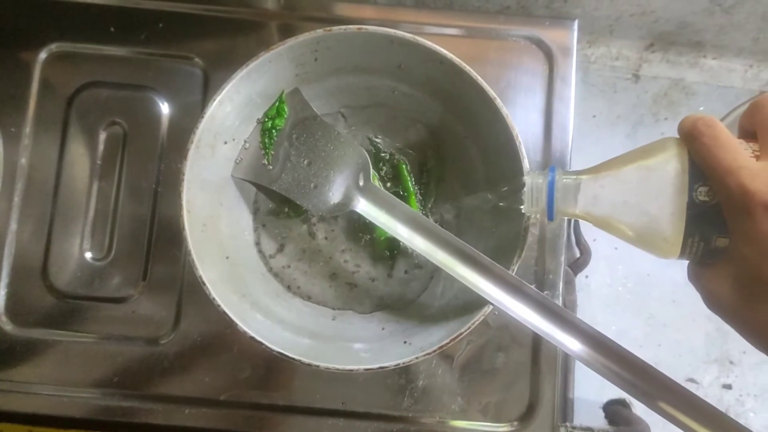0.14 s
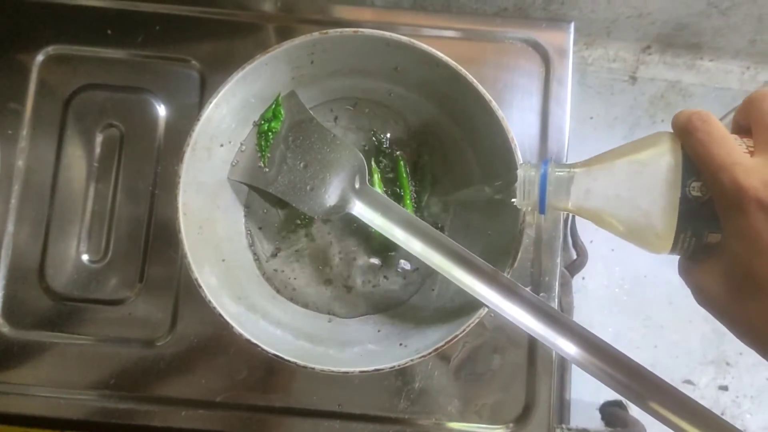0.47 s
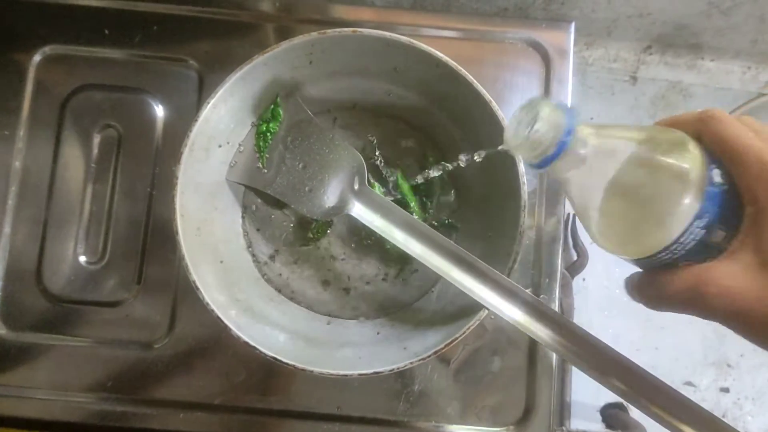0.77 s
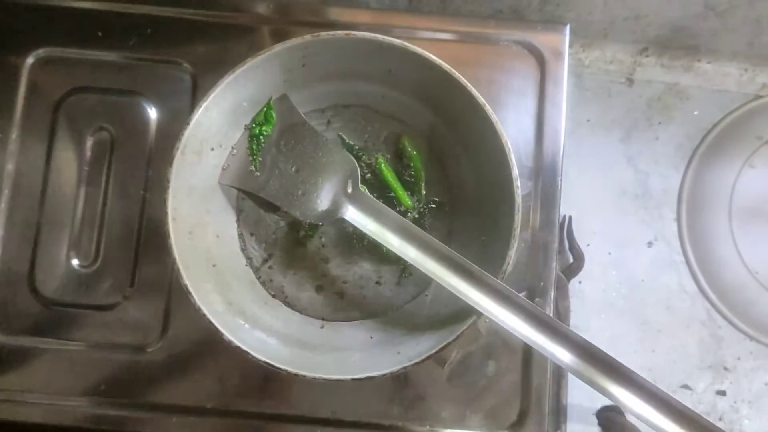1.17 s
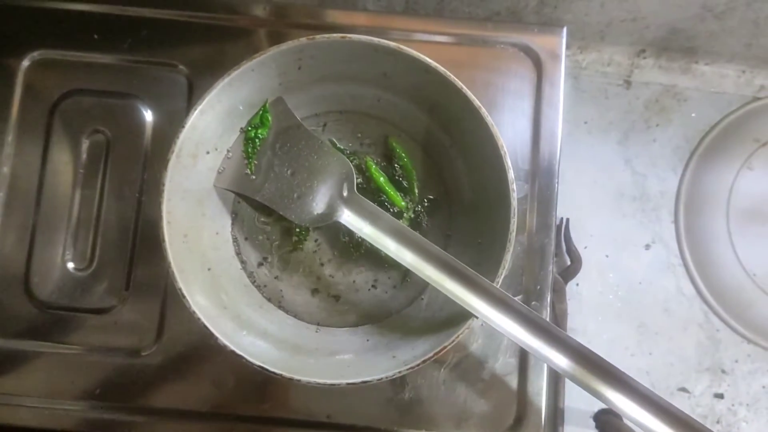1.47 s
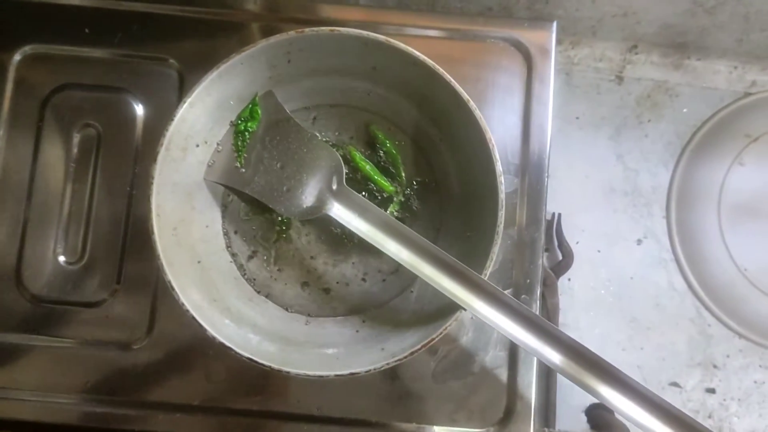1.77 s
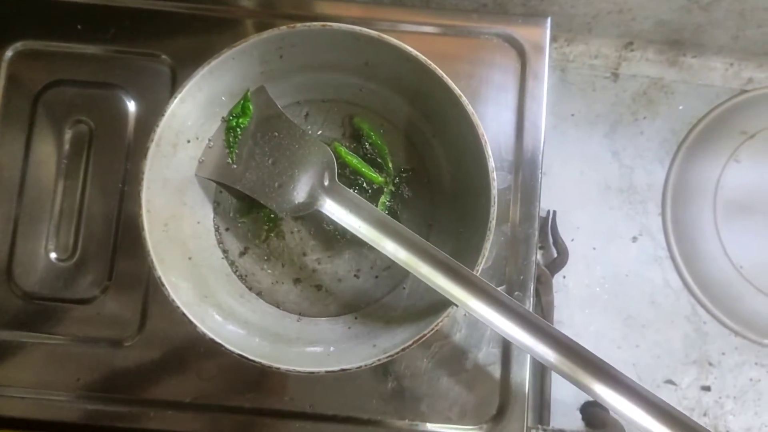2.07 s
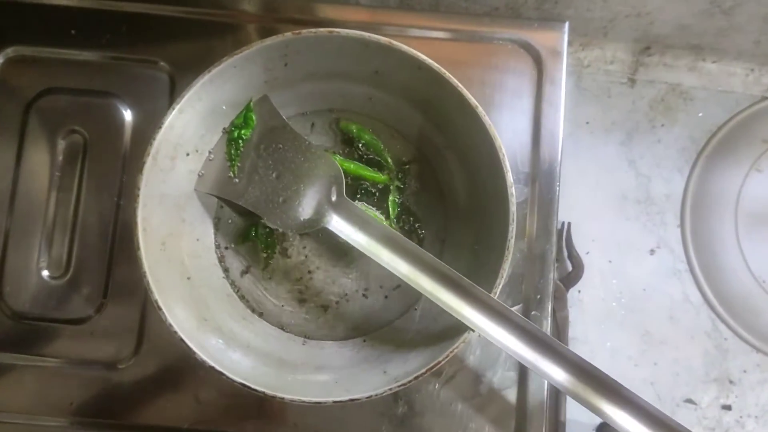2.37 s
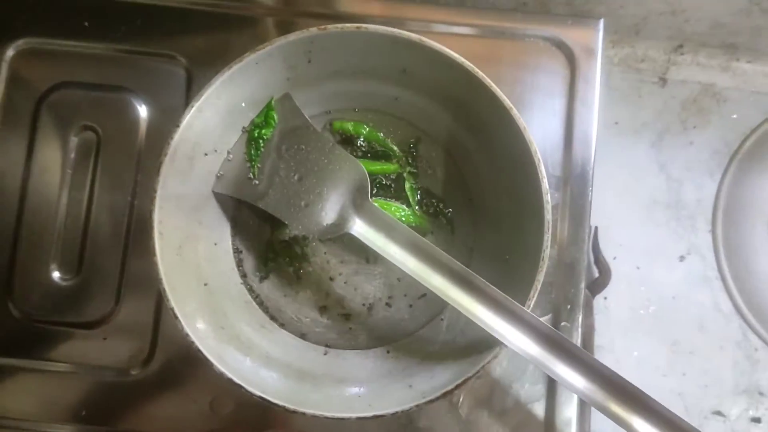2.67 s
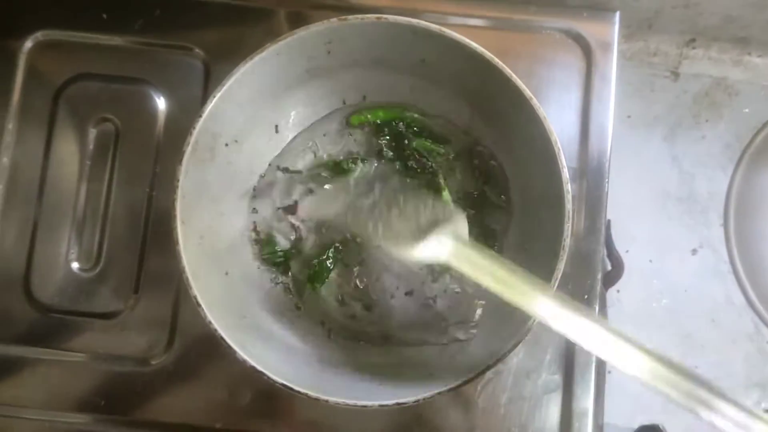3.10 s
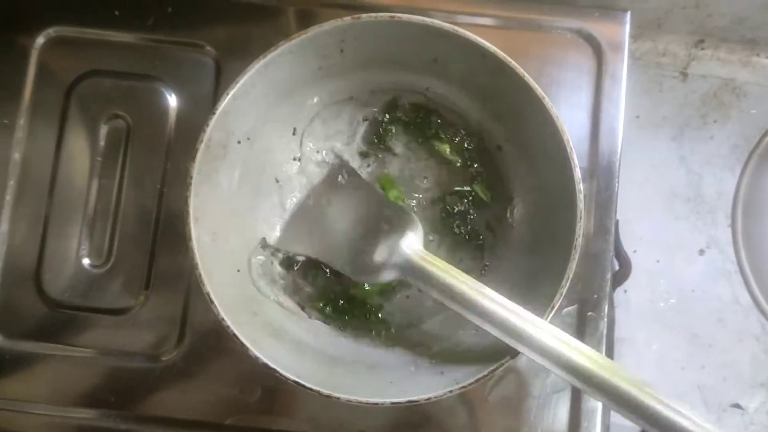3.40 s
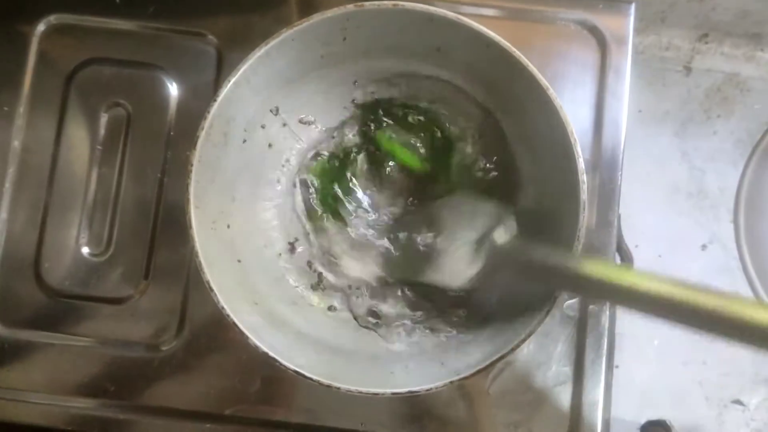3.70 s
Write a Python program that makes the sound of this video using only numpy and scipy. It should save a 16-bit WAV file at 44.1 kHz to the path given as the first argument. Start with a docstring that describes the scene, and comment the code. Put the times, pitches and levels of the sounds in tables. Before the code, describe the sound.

Hot oil sizzles and pops in a pan, then a metal spatula scrapes and stirs.

```python
"""Hot oil and green chillies sizzle in a metal pan as water is poured in from a bottle, heard in stereo
close to the pan in a small kitchen. Droplets burst in a dense crackle and bubbles ring in the liquid;
the sizzle thins out to single pops. Then a steel spatula scrapes and bumps through the pan, and the
liquid flares up again on the hot metal. Behind it lie a short tail off the walls and quiet room tone."""
import sys
import numpy as np
from scipy import signal
from scipy.fft import rfft, irfft, next_fast_len
from scipy.io import wavfile

SR = 44100
rng = np.random.default_rng(int(sys.argv[2]) if len(sys.argv) > 2 else 0)


def dump_mix(stems):
    """Bounce the given channels to the path in sys.argv[1] as a 16-bit WAV at rate SR."""
    frames = np.atleast_2d(stems).T  # one column per channel
    limited = np.clip(frames, -1, 1)  # hard clip at full scale
    pcm = np.round(limited * 32767).astype(np.int16)
    wavfile.write(sys.argv[1], SR, pcm)


N = 169785
T = np.arange(N) / SR

# The bright crack of a bursting droplet. Each row: frequency in Hz, relative level in dB.
CRACK_SPECTRUM = [(900, -40), (2700, -16), (4400, -15.5), (5800, -10.5), (6800, -5.5), (7350, 0),
                  (7750, 4.5), (8300, 0.5), (9200, -5), (10300, -16.5), (12000, -21), (13000, -18),
                  (16000, -29.5)]
# The lower body of bursts and bubbles. Each row: frequency in Hz, relative level in dB.
BODY_SPECTRUM = [(150, -13.5), (400, -9), (680, -10), (1050, -1.5), (1450, -5), (2000, 0), (2700, 4.5),
                 (3300, -0.5), (4300, -2), (7000, -13.5), (16000, -14)]
BURSTS_PER_S, BURST_SPREAD_DB = 620, 4.5   # the crackle at its densest
SIZE_LIMIT = 3.08   # largest burst or bubble, in units of its spread


def sizzle(droplets, bubbling):
    """Tiny bursts merge into hiss; larger ones crackle in clusters and thin out as the frying dies."""
    density = (droplets / droplets.max()) ** .49
    crackle = rms_one(bursts(BURSTS_PER_S * density, BURST_SPREAD_DB) / np.sqrt(density))
    crackle *= from_db(1.6 * drift(corner_hz=21))   # clusters
    hiss, simmer = from_db(-6) * np.sqrt(density), from_db(-11)
    crack = droplets * np.hypot(hiss, from_db(-2) * crackle)
    body = bubbling * np.hypot(simmer, from_db(-8.5) * crackle)
    return colour(crack * noise(), CRACK_SPECTRUM) + colour(body * noise(), BODY_SPECTRUM)


def pops():
    """A drop explodes in a millisecond; its spray crackles for a moment after."""
    # Single loud spits, and at 3.438 s the sharp crack of the spatula striking the pan. Each row: start in
    # seconds, relative level in dB, body offset in dB.
    spits = [(0.1619, -12.5, -1), (0.243, -12.5, -4.5), (0.2718, -8.5, -6), (0.3024, -5, -7.5),
             (0.3312, -12, -4), (0.4359, -12, -12), (0.657, -15, -6.5), (0.685, -33, -8), (0.7646, -10, -4),
             (0.86, -10.5, -6), (0.9343, -16.5, -1), (1.0062, -18, -18), (1.1029, -8.5, -30),
             (1.1912, -11.5, -9.5), (1.2893, -17.5, -1.5), (1.3362, -17, -31), (1.4546, -8.5, -12),
             (1.5891, -4, -10.5), (1.8996, -17.5, -10.5), (1.929, -18, -13), (1.9375, -15, -3),
             (2.1048, -13.5, -37), (2.2117, -13, -3.5), (2.461, -24, -15), (2.483, -15, -1.5),
             (2.505, -27, -28.5), (2.848, -24.5, 3.5), (2.9768, -26, -23), (3, -31, -28),
             (3.2871, -21, -25), (3.4384, -8, -13), (3.5549, -12.5, -7), (3.5947, -13.5, -8)]
    out, spray, t = np.zeros((2, N + SR)), np.zeros(N), T[:SR // 20]
    shape = swell(t, rise_s=.00074)
    spray_db, spray_decay_s = -45.5, .045
    for s, db, body_db in spits:
        start = int(s * SR)
        for spectrum, part_db in ((CRACK_SPECTRUM, -6), (BODY_SPECTRUM, body_db - 9)):
            burst = rms_one(colour(shape * rng.standard_normal((2, len(t))), spectrum))
            out[:, start:start + len(t)] += from_db(db + part_db) * rms(shape) * burst
        spray += from_db(db + spray_db) * (T > s) * np.exp(-np.abs(T - s) / spray_decay_s)
    crackle = bursts(BURSTS_PER_S, BURST_SPREAD_DB) * noise()
    return out[:, :N] + colour(spray * crackle, CRACK_SPECTRUM)


def bubbles(bubbling):
    """A dense swarm of small bubbles, each ringing for a few milliseconds at its own rising pitch."""
    per_s, spread_db, cycles_to_fade = 750, 4.6, 32
    low_hz, high_hz, glide_per_s = 980, 3870, 5.5
    when, pitch, size, place = rng.random((int(per_s * N / SR), 4)).T[:, :, None]
    t = T[:SR // 50]
    hz = low_hz * (high_hz / low_hz) ** pitch
    size_db = spread_db * np.minimum(-np.log(1 - size), SIZE_LIMIT)
    rings = hz * from_db(size_db - 60 * t * hz / cycles_to_fade) * chirp(t, hz, glide_per_s)
    samples = ((when * N).astype(int) + np.arange(len(t))).ravel()
    mid_side = np.cos(2 * np.pi * place), np.sin(2 * np.pi * place)
    swarm = np.array([np.bincount(samples, (rings * share).ravel(), N)[:N] for share in mid_side])
    return from_db(-2) * bubbling * rms_one(colour(swarm, BODY_SPECTRUM))


def gurgles():
    """Gain curve of the extra bubbling while the water wells up."""
    # Short surges of water. Each row: start in seconds, level in dB.
    surges = [(.655, -37.5), (0.767, -33.5), (0.867, -32.5), (1.272, -40.5), (1.513, -40), (1.672, -47),
              (1.818, -38), (2.085, -44.5), (2.307, -44.5)]
    return sum(from_db(db) * swell(T - s, rise_s=.0084) for s, db in surges)


def plops_and_clicks():
    """Large bubbles plop a little left of centre; the last two rows are short, dull clicks."""
    # Each row: start in seconds, level in dB, starting pitch in Hz, rise time in seconds.
    events = [(0.188, -29.5, 1070, 0.0011), (0.216, -24.5, 2660, 0.0012), (0.245, -31.5, 1170, 0.0017),
              (0.307, -40, 150, 0.0032), (0.393, -31.5, 1900, 0.0016), (0.486, -34, 1830, 0.0048),
              (0.508, -37.5, 1270, .003), (0.535, -32, 1166, 0.0032), (0.556, -36.5, 1193, 0.0086),
              (0.656, -36, 1180, 0.0032), (2.6348, -24.5, 2350, 0.00045), (2.652, -31, 2750, 0.00017)]
    out = np.zeros(N)
    for s, db, hz, rise_s in events:
        t = np.clip(T - s, 0, 1)
        out += from_db(db) * swell(t, rise_s) * chirp(t, hz, glide_per_s=1.6)
    return out * from_db([[2], [-2]])


def spatula_strokes():
    """The blade slips in tiny jerks: it grates, rings the pan and drags liquid on to the hot metal."""
    # Each row: start and length in seconds, scrape and sizzle levels in dB, grating pitch in Hz.
    strokes = [(2.363, 0.028, -43, -46.5, 2490), (2.382, 0.019, -37.5, -42, 2180),
               (2.428, 0.019, -41, -48, 2510), (2.561, 0.0097, -47.5, -69, 3340),
               (2.863, 0.024, -48.5, -41, 2720), (3.014, 0.0068, -30.5, -24, 3990),
               (3.091, 0.021, -42.5, -43, 2140), (3.301, 0.024, -44, -38, 2200),
               (3.437, 0.016, -27, -22.5, 3300), (3.464, 0.04, -44.5, -40, 2600),
               (3.622, 0.047, -41, -34, 4790), (3.674, 0.044, -43, -46, 1245),
               (3.675, 0.011, -40, -44, 3910), (3.718, 0.13, -45.5, -39.5, 2570),
               (3.735, 0.015, -33, -30.5, 3430), (3.802, 0.018, -33.5, -34, 3730)]
    # Resonances of the scraped pan. Each row: frequency in Hz, relative level in dB.
    pan_modes = [(1250, -3), (1880, -2), (2280, 0), (2570, -0.5), (3340, 1.5), (3620, -0.5), (3990, 5),
                 (4820, 4), (6130, 4)]
    rise_s, fall_s, mode_wander_db = .0066, .0063, 13.5
    scrape, flare, grate = np.zeros(N), np.zeros(N), np.zeros((2, N))
    slips = bursts(per_s=980, spread_db=3, rise_s=.0016)
    jerks = slips * noise()
    for s, length, scrape_db, flare_db, hz in strokes:
        shape = np.clip((T - s) / rise_s, 0, 1) * np.exp(-np.clip(T - s - length, 0, 1) / fall_s)
        force = from_db(scrape_db) * shape
        grate += rms(force) * rms_one(ring(force * jerks, hz, t60=.04))
        scrape += force
        flare += from_db(flare_db) * shape
    friction = scrape * slips * noise()
    ringing = np.zeros((2, N))
    for hz, db in pan_modes:
        wander_db = mode_wander_db * np.tanh(drift(corner_hz=10.4))
        ringing += from_db(db + wander_db) * ring(friction, hz, t60=.068)
    metal = from_db(-5.5) * friction.std() * rms_one(ringing) + from_db(-1.5) * grate
    # The rasp of steel on the pan. Each row: frequency in Hz, relative level in dB.
    rasp_spectrum = [(100, -17), (300, -6.5), (620, -13), (1100, -3.5), (1500, -5.5), (2500, 1.5),
                     (3500, -2), (5000, -4.5), (9000, -33), (16000, -47)]
    rasp = from_db(-3.5) * colour(friction, rasp_spectrum)
    return metal + rasp + colour(flare * slips * noise(), CRACK_SPECTRUM)


def pan_thuds():
    """Soft low thuds in the pan, each with a dull rattle: spatula knocks and one slosh of liquid."""
    # Each row: start in seconds, level in dB, thud pitch in Hz, rattle against thud in dB.
    thuds = [(2.6915, -30.5, 325, -2), (3.024, -48.5, 198, -4), (3.315, -42.5, 368, -3),
             (3.445, -34, 233, -10.5), (3.625, -44, 294, -8)]
    # The dull rattle. Each row: frequency in Hz, relative level in dB.
    rattle_spectrum = [(60, -39), (170, -13), (320, -1), (520, -8), (950, -6.5), (1400, -22), (2100, -15),
                       (4000, -28.5), (16000, -48)]
    thud, rattle = np.zeros(N), np.zeros(N)
    for s, db, hz, rattle_db in thuds:
        shape = from_db(db) * swell(T - s, rise_s=.0054)
        phase = 2 * np.pi * hz * (T - s)
        thud += shape * (np.sin(phase) + from_db(-15) * np.sin(2.3 * phase))
        rattle += from_db(rattle_db) * shape
    return thud + colour(rattle * noise(), rattle_spectrum)


def spatula_ring():
    """The steel blade rings on faintly after a tap."""
    # Taps on the blade. Each row: time in seconds, strength in dB.
    taps = [(3.314, -62.5), (3.449, -61.5)]
    # Its resonances. Each row: frequency in Hz, gain in dB, seconds to fall by 60 dB.
    blade_modes = [(340, 5, 0.81), (940, -3, 1.1), (1650, 9.5, 1.1), (2230, 27.5, 0.088), (4340, 25, .045)]
    impulses = np.zeros(N)
    for s, db in taps:
        impulses[int(s * SR)] = from_db(db)
    return sum(from_db(db) * ring(impulses, hz, t60) for hz, db, t60 in blade_modes)


def kitchen_walls(x):
    """Hard walls close by send a short diffuse tail back to the microphone."""
    t, t60 = T[:SR // 2], .064
    tail = rng.standard_normal((2, len(t))) * from_db(-60 * t / t60) * (t > .002)
    tail /= np.sqrt(np.sum(tail ** 2, axis=1, keepdims=True))
    return from_db(-5.5) * signal.fftconvolve(x, tail, axes=1)[:, :N]


def room_tone():
    """Behind the pan: a low rumble with mains hum, the room's steady noise and a faint thin whine."""
    # The rumble and the steady noise. Each row: frequency in Hz, relative level in dB.
    rumble_spectrum = [(25, -1), (65, 2), (120, -4), (170, -6), (300, -9), (700, -25), (1500, -37)]
    steady_spectrum = [(40, -18.5), (200, 2), (450, 1), (700, -1.5), (3000, -23.5)]
    # Rumble and hum sink together. Each row: time in seconds, level in dB.
    rumble_levels = [(0, -57.5), (2.1, -59.5), (2.7, -69.5), (3.85, -66)]
    hum_hz, whine_hz = 62.6, 443
    rumble = colour(noise(), rumble_spectrum) + from_db(-1) * np.sin(2 * np.pi * hum_hz * T)
    steady = colour(noise(), steady_spectrum) + np.sin(2 * np.pi * whine_hz * T)
    return gain_curves(rumble_levels)[0] * rumble + from_db(-66.5) * steady


def colour(x, spectrum):
    """Shape two unrelated signals with a causal filter of unit power and spread them in stereo."""
    # Balance at the microphone. Each row: frequency in Hz, left minus right in dB.
    balance = [(60, 0), (200, 3), (700, 0.5), (1100, -1), (1700, 4.5), (3200, 4), (4300, 1.5), (5800, -4),
               (7000, -5.5), (7700, -16), (8700, 3.5), (9700, 3), (11500, -1.5), (13000, 7), (16000, -9.5)]
    # Stereo width. Each row: frequency in Hz, correlation of left and right.
    likeness = [(60, 0.7), (300, 0.42), (1000, 0.86), (2500, 0.1), (4000, -0.12), (7500, -0.068),
                (15000, 0.2)]
    size = 2 * next_fast_len(x.shape[1] // 2 + SR // 20)
    hz = np.arange(size // 2 + 1) * SR / size
    gain = rms_one(from_db(at_hz(spectrum, hz)))
    lean = from_db(at_hz(balance, hz) * np.array([[.5], [-.5]]))
    cepstrum = irfft(np.log(gain * lean / np.sqrt(np.mean(lean ** 2, axis=0))))
    cepstrum[:, 1:size // 2] *= 2   # fold to minimum phase, so attacks stay sharp
    cepstrum[:, size // 2 + 1:] = 0
    alike = np.clip(at_hz(likeness, hz), -1, 1)
    mid, side = rfft(x, size)
    pair = np.sqrt(1 + alike) * mid + np.sqrt(1 - alike) * side * [[1], [-1]]
    return irfft(pair * np.exp(rfft(cepstrum)))[:, :x.shape[1]]


def bursts(per_s, spread_db, rise_s=.00072):
    """Envelope of a swarm of millisecond bursts, many small and few large, at unit rms."""
    onsets = rng.random(N) < per_s / SR
    sizes = from_db(spread_db * np.minimum(rng.exponential(1, N), SIZE_LIMIT))
    power = signal.fftconvolve((onsets * sizes) ** 2, swell(T[:SR // 20], rise_s) ** 2)[:N]
    return rms_one(np.sqrt(np.abs(power)))


def ring(x, hz, t60):
    """Resonator: a unit click starts a sine of height 1 that falls 60 dB in t60 seconds."""
    r, w = from_db(-60 / (t60 * SR)), 2 * np.pi * hz / SR
    return signal.lfilter([0, np.sin(w)], [1, -2 * r * np.cos(w), r * r], x + 1e-18)


def chirp(t, hz, glide_per_s):
    """A sine that rises from hz by glide_per_s times that pitch each second."""
    return np.sin(2 * np.pi * hz * (t + glide_per_s * t * t / 2))


def swell(t, rise_s):
    """Envelope that peaks at 1 after rise_s and dies away."""
    u = np.clip(t / rise_s, 0, 100)
    return u * np.exp(1 - u)


def drift(corner_hz):
    """Slow random wander at unit rms."""
    r = np.exp(-2 * np.pi * corner_hz / SR)
    return rms_one(signal.lfilter([1], [1, -2 * r, r * r], rng.standard_normal(N + SR))[SR:])


def noise():
    """Two unrelated white noises."""
    return rng.standard_normal((2, N))


def gain_curves(rows):
    """One gain curve for each dB column, from rows that start with a time in seconds."""
    s, *columns = np.transpose(rows)
    return [from_db(np.interp(T, s, db)) for db in columns]


def at_hz(points, hz):
    """Read a table on a log-frequency axis."""
    f, value = np.transpose(points)
    return np.interp(np.log(hz + 1), np.log(f), value)


def from_db(db):
    """Decibels to gain."""
    return 10 ** (np.asarray(db) / 20)


def rms(x):
    """Root mean square, kept above zero."""
    return np.sqrt(np.mean(x ** 2) + 1e-20)


def rms_one(x):
    """Scale to unit rms."""
    return x / rms(x)


def scene():
    """Pan and spatula close to the microphone, with the kitchen behind them."""
    # Level of the sizzle and bubbling, with brief dips just before loud pops.
    # Each row: time in seconds, bursting droplets in dB, bubbling in dB.
    levels = [(0, -33, -34.5), (.31, -33, -41), (.45, -36, -39.5), (.62, -35.5, -38), (.85, -34, -39.5),
              (1.15, -35, -39.5), (1.31, -38.5, -45.5), (1.44, -39.5, -49.5), (1.48, -34, -40),
              (1.57, -44, -56), (1.615, -32.5, -40), (1.73, -37.5, -41), (1.8, -39, -50.5),
              (1.88, -43, -48.5), (1.95, -42.5, -48.5), (2.16, -43, -47.5), (2.27, -42, -50.5),
              (2.35, -53.5, -55.5), (2.5, -53.5, -61.5), (2.6, -55.5, -56.5), (2.8, -57.5, -65),
              (2.95, -56, -65.5), (3.08, -41, -47.5), (3.22, -48, -55.5), (3.42, -54, -62.5),
              (3.53, -43, -48.5), (3.59, -64, -64), (3.75, -32.5, -38.5), (3.85, -35, -47)]
    droplets, bubbling = gain_curves(levels)
    bubbling = np.hypot(bubbling, gurgles())
    frying = sizzle(droplets, bubbling) + bubbles(bubbling) + plops_and_clicks() + pops()
    pan = frying + spatula_strokes() + pan_thuds() + spatula_ring()
    return pan + kitchen_walls(pan) + room_tone()


def record(dry):
    """A steep low-pass cuts the highest treble."""
    cutoff_hz = 15900
    return signal.sosfilt(signal.ellip(10, .2, 80, cutoff_hz, fs=SR, output="sos"), dry)


dry = scene()
out = record(dry)
dump_mix(out)
```